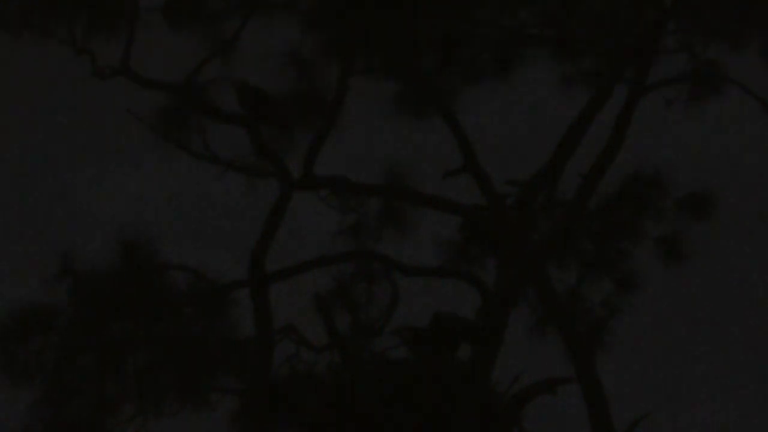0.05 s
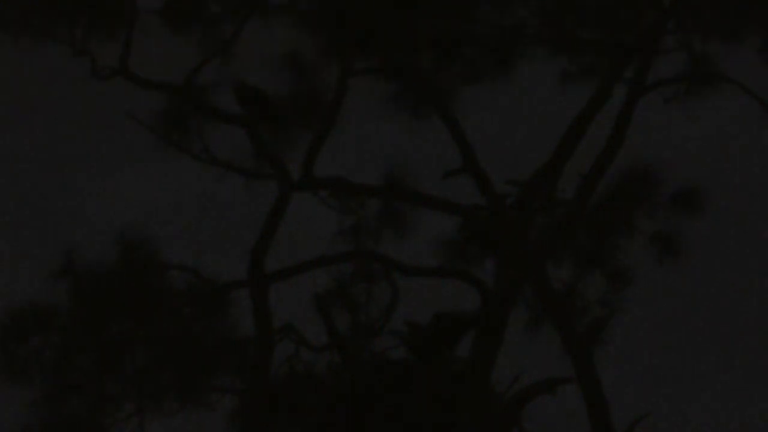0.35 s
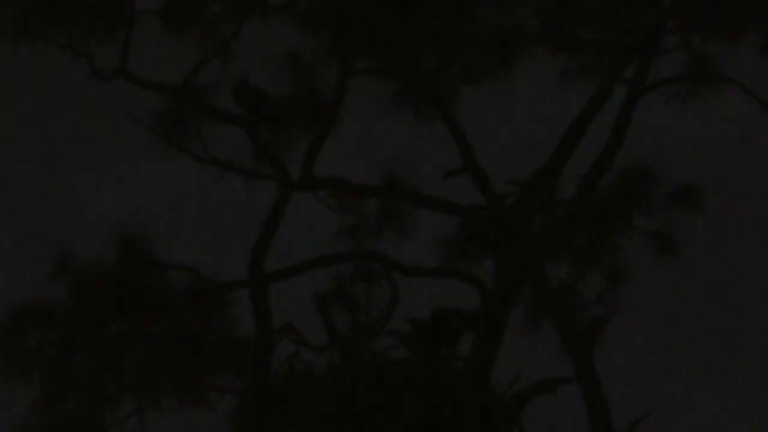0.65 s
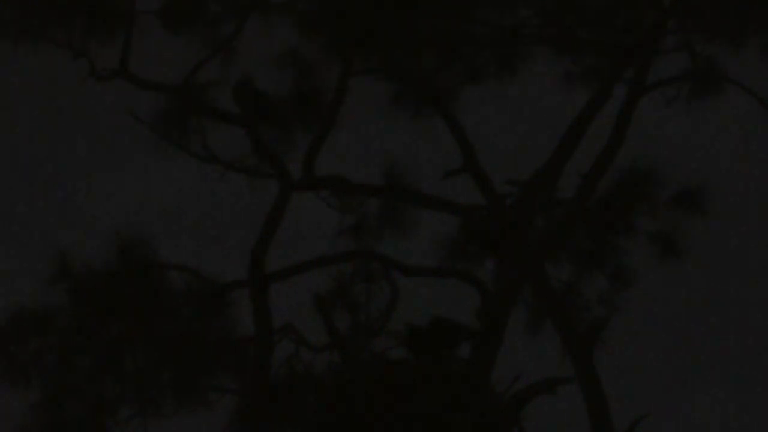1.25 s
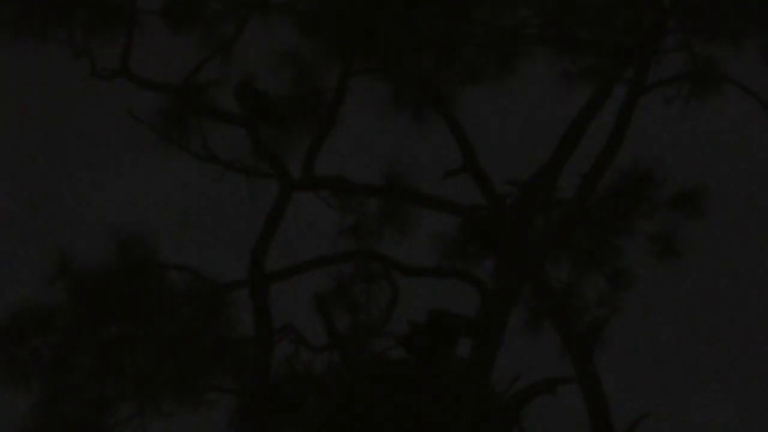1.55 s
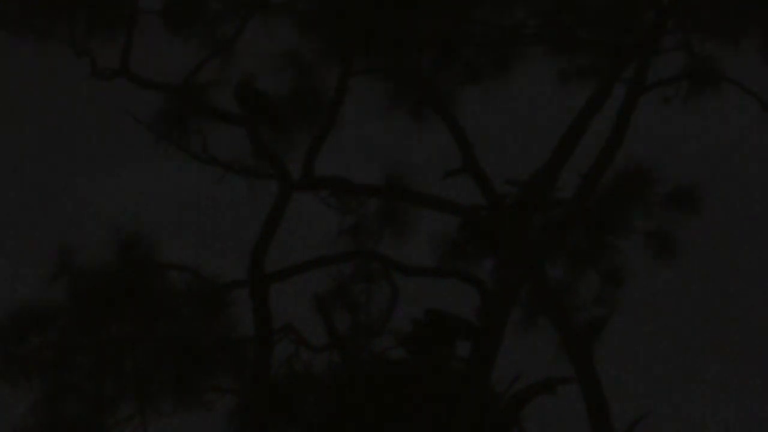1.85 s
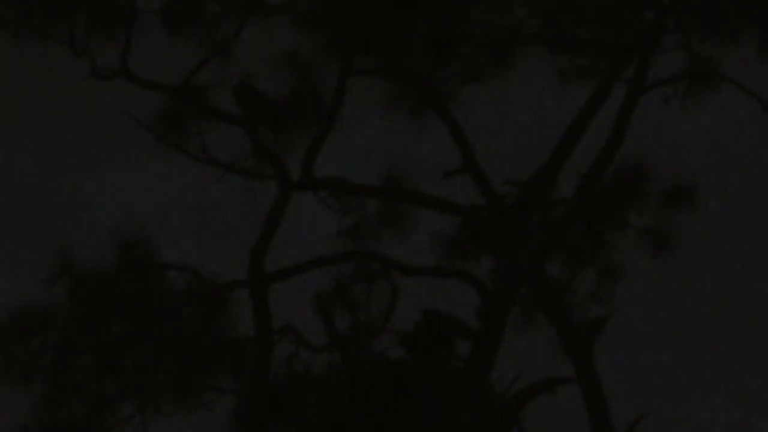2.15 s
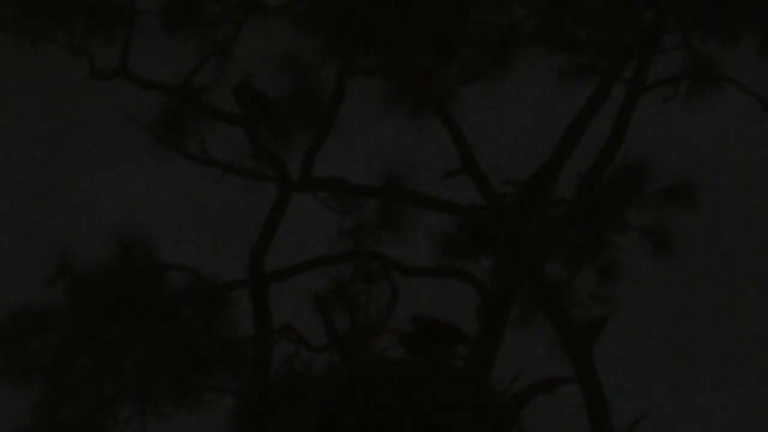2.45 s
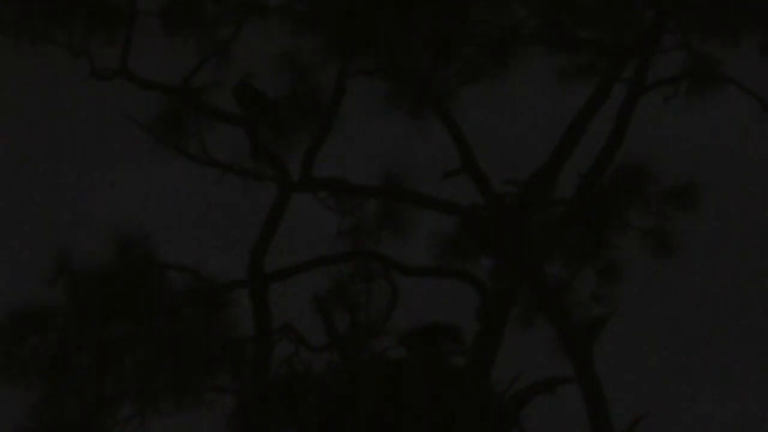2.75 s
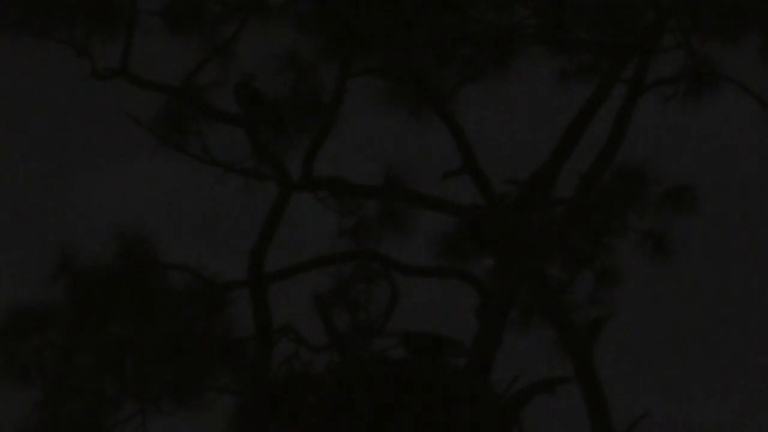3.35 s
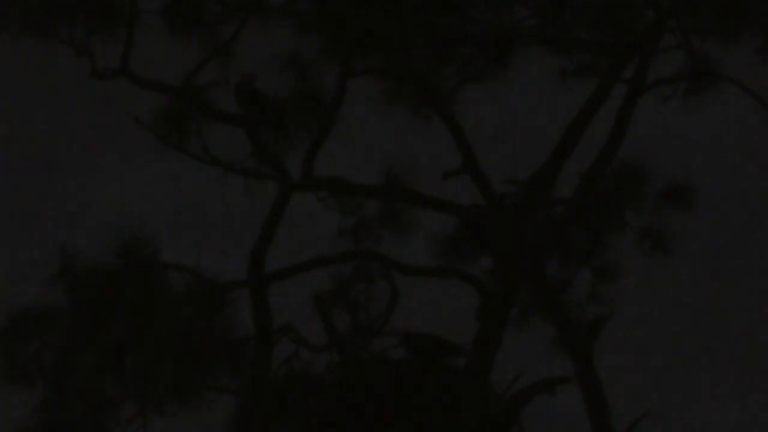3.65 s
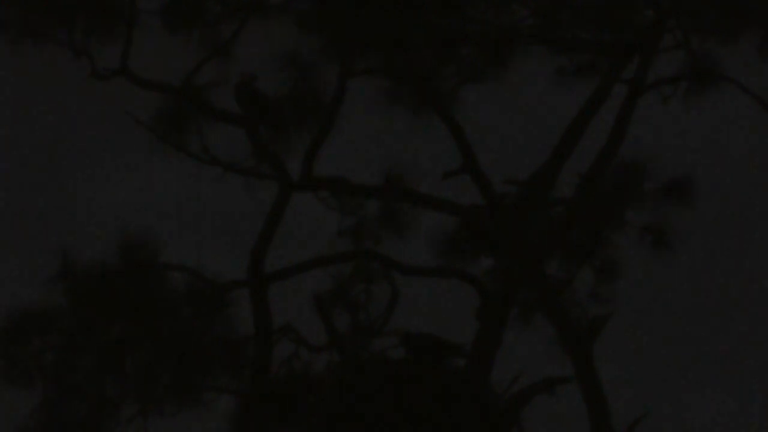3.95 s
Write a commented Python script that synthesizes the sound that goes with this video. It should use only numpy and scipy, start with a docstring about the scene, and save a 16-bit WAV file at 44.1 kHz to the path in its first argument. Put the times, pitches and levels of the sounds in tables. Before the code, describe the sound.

Outdoors among trees, a bird wails three times, each high call sliding up and then dropping sharply. Distant traffic and a low engine hum continue behind, with faint steady insects and a breeze that rises in the needles toward the end.

```python
"""A pine at dawn: a bird gives three thin, rising wails, each ending in a quick downward flick,
and a few faint peeps. In the first wail, the other side of its syrinx sounds a lower tone that
mixes with the main one. The trunks scatter the calls. Behind them: a distant engine's drone,
road noise, a breeze rising in the needles and a steady insect-like hiss."""
import sys
import numpy as np
from scipy import signal
from scipy.fft import rfft, irfft
from scipy.io import wavfile

SR = 44100
rng = np.random.default_rng(int(sys.argv[2]) if len(sys.argv) > 2 else 0)


def generate_wav(signal):
    """Clip the signal to [-1, 1] and save it as 16-bit WAV at the path in sys.argv[1]."""
    frames = np.transpose(np.atleast_2d(signal))
    scaled = np.clip(frames, -1, 1) * 32767
    pcm = np.round(scaled).astype(np.int16)
    wavfile.write(sys.argv[1], SR, pcm)


N = 176400
TIME = np.arange(N) / SR
BIN_HZ = np.maximum(np.arange(N // 2 + 1) * SR / N, 1)
SHIMMER_DB = 0.73  # level flutter of both voices


def wail(contour):
    """One side of the syrinx: three strong harmonics under a thin sheen. Returns sound and phase."""
    fundamental = [(.48, -60), (.515, -49.5), (.61, -49), (.70, -41.5), (.725, -59), (1.25, -63),
                   (1.42, -67), (1.54, -49), (1.63, -47), (1.71, -41.5), (1.75, -62), (2.72, -69),
                   (3.06, -60), (3.19, -48), (3.23, -63)]  # swells into each flick: (time [s], level [dB])
    trim_db = [0, 1.5]  # (octave [dB], third harmonic [dB])
    sheen = [(.48, -79), (.66, -74), (.71, -68.5), (.75, -79), (1.25, -76), (1.42, -72), (1.52, -77),
             (1.58, -83), (1.76, -88), (2.72, -86), (3.0, -81), (3.1, -70), (3.15, -77), (3.2, -71),
             (3.25, -79)]  # envelope of harmonics 4-7: (time [s], level [dB])
    sheen_colour = [(6700, -12), (7700, -4), (8600, -3), (9300, 0.5), (9900, 0), (10800, -6), (11400, -7),
                    (12400, -11), (14000, -18)]  # their EQ: (frequency [Hz], gain [dB])
    hz, *harmonic_db = in_time(contour)
    sheen_db, = in_time(sheen)
    phase = phase_of(hz * quaver())
    voice = tone(phase, in_time(fundamental)[0] + SHIMMER_DB * drift(40))
    for k, db in enumerate(harmonic_db):
        voice += tone((k + 2) * phase, db + trim_db[k] + 1.8 * drift(40))
    for k in range(4, 8):
        voice += tone(k * phase, sheen_db + at_hz(sheen_colour, k * hz) + 2.9 * drift(30))
    return voice * gate(contour[0][0], contour[-1][0]), phase


def quaver(start=1.267, end=1.39, rate_hz=35, depth=0.02):
    """A fast, fading pitch tremble: the shaky start of the second wail."""
    fade = np.sqrt(np.clip((end - TIME) / (end - start), 0, 1)) * (TIME > start)
    return 1 + depth * fade * np.sin(2 * np.pi * rate_hz * (TIME - start))


def low_voice(main_phase):
    """The other side of the syrinx: its own overtones first, then mostly sum tones with the main voice."""
    contour = [(.335, 1320, -67), (.37, 1342, -59), (.44, 1395, -61), (.455, 1380, -72), (.5, 1376, -78),
               (.59, 1410, -82), (.70, 1445, -84)]  # the lower tone: (time [s], pitch [Hz], level [dB])
    harmonics = [(2, 0.5), (3, -0.5), (4, -14)]  # its overtones: (multiple, gain [dB])
    mixing = [(.45, -61), (.50, -55), (.58, -49), (.62, -50.5), (.66, -57), (.692, -53), (.705, -66)]  # how strongly the voices mix: (time [s], level [dB])
    upper_sums = [(2, -8.5), (3, -35), (4, -29)]  # higher sum tones: (multiple of the main pitch, gain [dB])
    hz, db = in_time(contour)
    mix_db, = in_time(mixing)
    phase = phase_of(hz)
    own = sum(tone(round(k) * phase, db + gain) for k, gain in harmonics)
    own *= gate(contour[0][0], contour[-1][0])
    mixed = tone(main_phase + phase, mix_db)
    mixed += sum(tone(round(k) * main_phase + phase, mix_db + gain) for k, gain in upper_sums)
    mixed += tone(3 * main_phase - phase, mix_db - 17)  # difference tone
    mixed *= gate(mixing[0][0], mixing[-1][0])
    return (own + mixed) * from_db(SHIMMER_DB * drift(40))


def bird():
    """Three wails, the first two-voiced, and a few peeps, all with a slight rasp."""
    # the wails: (time [s], pitch [Hz], octave level [dB], third harmonic level [dB])
    wail_1 = [(0.48, 1872, -63, -79), (0.51, 1910, -64, -80), (0.582, 1932, -59, -75),
              (0.588, 1930, -58, -87), (0.616, 1954, -53, -73), (0.69, 1984, -52.5, -71),
              (0.71, 1886, -36.5, -53), (0.728, 1748, -45.5, -62), (0.74, 1697, -68, -83)]
    wail_2 = [(1.25, 1640, -66, -89), (1.26, 1695, -51.5, -79), (1.274, 1792, -65, -80),
              (1.286, 1770, -60, -88), (1.294, 1794, -55, -69), (1.314, 1758, -57.5, -82),
              (1.412, 1818, -51.5, -74), (1.532, 1907, -51.5, -81), (1.542, 1932, -49, -88),
              (1.562, 1927, -49.5, -72), (1.636, 1952, -50.5, -72), (1.644, 1943, -52, -83),
              (1.702, 1974, -49, -69), (1.714, 1953, -44, -85), (1.724, 1930, -43.5, -69),
              (1.76, 1695, -46, -75)]
    wail_3 = [(2.72, 1694, -63, -86), (2.742, 1680, -61.5, -70), (2.758, 1739, -59, -85),
              (2.77, 1710, -57, -70), (2.812, 1807, -56, -86), (2.82, 1793, -61, -95),
              (2.854, 1807, -56.5, -79), (2.942, 1818, -57.5, -72), (2.974, 1843, -46, -80),
              (3.088, 1874, -56.5, -71), (3.144, 1884, -56, -70), (3.19, 1911, -50, -69),
              (3.2, 1885, -47, -69), (3.206, 1870, -57, -86), (3.218, 1821, -43, -74),
              (3.224, 1795, -51, -83), (3.23, 1757, -53, -71), (3.245, 1696, -60, -81)]
    # faint peeps: (time [s], length [s], start pitch [Hz], end pitch [Hz], level [dB])
    peep_notes = [(0.244, 0.035, 2060, 2110, -54), (.305, .03, 3430, 3560, -59.5),
                  (.96, .04, 3030, 3080, -67)]
    first, first_phase = wail(wail_1)
    second, _ = wail(wail_2)
    third, _ = wail(wail_3)
    peeps = np.zeros(N)
    for start, length, from_hz, to_hz, db in peep_notes:
        glide = np.interp(TIME, [start, start + length], [from_hz, to_hz])
        peeps += tone(phase_of(glide), db) * gate(start, start + length)
    calls = first + low_voice(first_phase) + second + third + peeps
    rasp = 1 + 0.09 * drift(260)
    return calls * rasp


def trees(calls, t60_s=0.73, echo_s=0.13):
    """Trunks scatter the calls into a diffuse tail, with one far echo."""
    colour = [(1900, -7), (3400, -3), (3900, 1.5), (5500, -3), (10000, -8)]  # what the trees send back: (frequency [Hz], gain [dB])
    tail = rng.standard_normal((2, SR)) * from_db(-60 * TIME[:SR] / t60_s)
    tail *= from_db(-10) / np.sqrt(np.sum(tail[0] ** 2))
    send = irfft(rfft(calls) * from_db(at_hz(colour, BIN_HZ)), N)
    echo = from_db(-23) * np.interp(TIME - echo_s, TIME, send, left=0)
    return signal.fftconvolve(send[None], tail, axes=1)[:, :N] + echo


def engines(drone_hz=86.73, beat_hz=78.16, motor_hz=183.5, motor_width_hz=4.2):
    """A distant engine's tones beat against each other while another motor draws nearer."""
    # envelopes of the main tone, beating tone and nearing motor: (time [s], level [dB])
    drone_level = [(0, -36.5), (.5, -34), (1.2, -35), (2.1, -33), (2.6, -36), (3.3, -36.5), (3.8, -34),
                   (4, -32.5)]
    beat_level = [(0, -59), (1.4, -56), (1.9, -40.5), (2.35, -46), (2.7, -54), (3.4, -50), (3.8, -46),
                  (4, -48)]
    motor_level = [(0, -56), (2.8, -53.5), (3.3, -49.5), (3.8, -42.5), (4, -40)]
    # weaker engine tones: (pitch [Hz], level [dB], level swing [dB], phase wander [rad])
    weak_tones = [(40.3, -70.5, -4, 0.46), (216.8, -53, 3.5, 0.45)]
    spread = np.array([[-.15], [.15]])  # left and right phase [rad]
    drone = tone(2 * np.pi * drone_hz * TIME + 0.1 * drift(2.3) + spread, in_time(drone_level)[0])
    beat = tone(2 * np.pi * beat_hz * TIME + 0.67 * drift(1.3) + spread, in_time(beat_level)[0])
    weak = sum(tone(2 * np.pi * hz * TIME + wander * drift(1.3) + spread, db + swing * drift(1.4))
               for hz, db, swing, wander in weak_tones)
    motor_band = 1 / (1 + ((BIN_HZ - motor_hz) / motor_width_hz) ** 2)
    motor = fader(motor_level) * noise(motor_band, alike=0.73)
    return (drone + beat + weak + motor) * pan(-1.5)


def road():
    """Low traffic rumble and the roar of tyres."""
    # envelopes: (time [s], level [dB])
    rumble_level = [(0, -43.5), (1.0, -43.5), (1.8, -46), (2.1, -43), (2.8, -43), (3.3, -42), (3.7, -41.5),
                    (4, -38.5)]
    tyre_level = [(0, -42), (.7, -43), (1.45, -43), (2.05, -41), (2.55, -42.5), (3.3, -41.5), (4, -39)]
    # noise colours: (frequency [Hz], gain [dB])
    rumble_colour = [(10, -43), (28, -29), (45, -11.5), (70, -5.5), (100, -1.5), (135, 3.5), (200, 1.5),
                     (260, -5.5), (330, -10.5), (480, -17), (800, -51), (2000, -73)]
    tyre_colour = [(20, -40), (250, -17), (480, -9.5), (650, -5.5), (830, 0), (1000, -1.5), (1130, -4.5),
                   (1370, -2.5), (1750, -13), (2050, -11.5), (2400, -19.5), (3300, -27), (4300, -37),
                   (6000, -57), (9000, -90)]
    # stereo images: (frequency [Hz], left-right likeness [-1 to 1])
    rumble_image = [(30, 0), (55, 0.78), (90, 1), (250, 0.98), (400, 0.74)]
    tyre_image = [(400, 0.9), (1000, .83), (1600, 0.94), (2500, 0.93)]
    rumble = fader(rumble_level, trim_db=1.5) * coloured(rumble_colour, rumble_image)
    tyres = fader(tyre_level, trim_db=1) * coloured(tyre_colour, tyre_image)
    return rumble * pan(-1.5) + tyres * pan(2.5)


def breeze():
    """Air rushes through the pine needles and rustles them in soft swells."""
    # envelopes: (time [s], level [dB])
    rush_level = [(0, -70), (1.1, -61), (1.8, -60.5), (2.15, -57.5), (2.6, -58.5), (3.0, -57.5), (3.3, -58),
                  (3.58, -55), (3.75, -56.5), (3.9, -59), (4, -61.5)]
    rustle_level = [(0, -84), (1.8, -77), (2.1, -68), (2.6, -83), (2.9, -69), (3.2, -67), (3.35, -73),
                    (3.5, -60), (3.62, -62), (3.75, -68), (3.88, -58.5), (4, -60)]
    # noise colours: (frequency [Hz], gain [dB])
    rush_colour = [(100, -25), (1200, -19.5), (2000, -1), (2600, 2.5), (3000, 1), (3700, -0.5), (4900, -8),
                   (5500, -20), (6100, -29), (6700, -13), (8000, -16), (9300, -16), (11500, -22),
                   (15500, -33)]
    rustle_colour = [(2500, -12), (4000, 6), (5000, -2), (6100, -9), (7000, 2), (9000, 3), (10300, -4),
                     (11500, -15), (13000, -12), (15500, -22)]
    # stereo images: (frequency [Hz], left-right likeness [-1 to 1])
    rush_image = [(2000, 0.8), (2800, 0.92), (3500, 0.78), (4500, .3), (6000, 0.1), (9000, .2)]
    rustle_image = [(3000, .8), (4500, 0.41), (6000, -0.049), (9000, -0.11), (12000, .2)]
    rush = fader(rush_level, trim_db=1.5) * coloured(rush_colour, rush_image)
    rustle = fader(rustle_level, trim_db=drift(25)) * coloured(rustle_colour, rustle_image)
    return rush + rustle


def insect_hiss():
    """Two steady insect-like noise bands over a fine, wide hiss."""
    # insect bands: (centre [Hz], half width [Hz], level [dB], left-right likeness [-1 to 1])
    bands = [(4760, 197, -65.5, 0.026), (7075, 400, -67.5, 0.67)]
    colour = [(1500, -1), (3000, -16), (4200, -1.5), (5000, 1), (5500, -6), (6100, -11), (6700, -3.5),
              (8000, -10), (9500, -8), (11300, -15), (12100, -10), (12800, -13), (14000, -13), (15500, -21)]  # hiss EQ: (frequency [Hz], gain [dB])
    image = [(2900, 0.23), (3600, -0.46), (4400, -0.21), (5700, -0.47), (7000, 0.21), (9000, -0.19),
             (11500, 0.083), (13000, 0)]  # its stereo image: (frequency [Hz], left-right likeness [-1 to 1])
    insects = sum(from_db(db) * noise(np.exp(-.5 * ((BIN_HZ - hz) / width) ** 2), alike)
                  for hz, width, db, alike in bands)
    return insects + from_db(-59.5) * coloured(colour, image) * pan(-1.5)


def from_db(db):
    """Decibels to gain."""
    return 10 ** (np.asarray(db) / 20)


def rms_one(x):
    """Scale to unit rms."""
    return x / np.sqrt(np.mean(x ** 2) + 1e-20)


def in_time(rows):
    """Each column of a curve, sample by sample."""
    times, *columns = np.transpose(rows)
    return [np.interp(TIME, times, column) for column in columns]


def fader(envelope, trim_db=0):
    """Gain that rides a level curve."""
    return from_db(in_time(envelope)[0] + trim_db)


def at_hz(points, hz):
    """Read a curve on a log-frequency axis."""
    freqs, values = np.transpose(points)
    return np.interp(np.log(hz), np.log(freqs), values)


def drift(rate_hz):
    """Random wander, mostly slower than rate_hz; rms 1."""
    return rms_one(irfft(rfft(rng.standard_normal(N)) / (1 + (BIN_HZ / rate_hz) ** 2) * (BIN_HZ > 1), N))


def gate(start, end, ramp_s=0.0066):
    """Open from start to end, with short ramps."""
    return np.clip(np.minimum(TIME - start, end - TIME) / ramp_s + .5, 0, 1)


def phase_of(hz, jitter=0.0032):
    """Running phase of a slightly unsteady pitch."""
    return 2 * np.pi * np.cumsum(hz * (1 + jitter * drift(67))) / SR


def tone(phase, db):
    """A sine at an rms level."""
    return np.sqrt(2) * from_db(db) * np.sin(phase)


def pan(db):
    """Stereo gains with the left db above the right."""
    return from_db(np.array([[db], [-db]]) / 2)


def noise(gain, alike):
    """Mid-side noise with a given spectrum and left-right likeness; rms 1."""
    mid, side = rfft(rng.standard_normal((2, N))) * gain
    alike = np.clip(alike, -1, 1)
    return rms_one(irfft(np.sqrt(1 + alike) * mid + np.sqrt(1 - alike) * side * [[1], [-1]], N))


def coloured(colour, image):
    """Noise that follows tables of colour and stereo image; rms 1."""
    return noise(from_db(at_hz(colour, BIN_HZ)), at_hz(image, BIN_HZ))


def scene():
    """The bird among the trees, over a bed of traffic, breeze and hiss."""
    calls = bird()
    return calls * pan(-1.1) + trees(calls) + engines() + road() + breeze() + insect_hiss()


def record(dry):
    """A steep high cut on the whole mix."""
    cutoff_hz = 15700
    hz = np.linspace(0, SR / 2, N + 1)
    return irfft(rfft(dry, 2 * N) / np.sqrt(1 + (hz / cutoff_hz) ** 400))[:, :N]


dry = scene()
out = record(dry)
generate_wav(out)
```